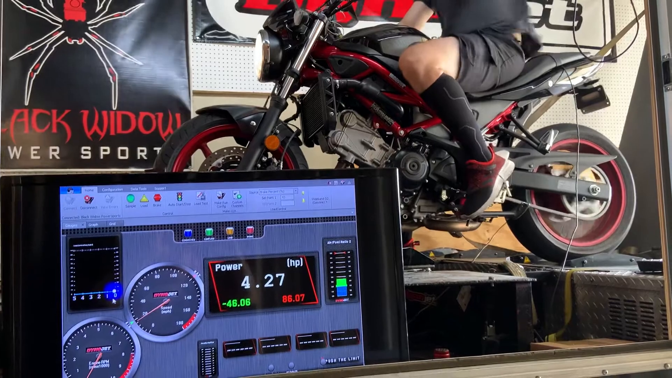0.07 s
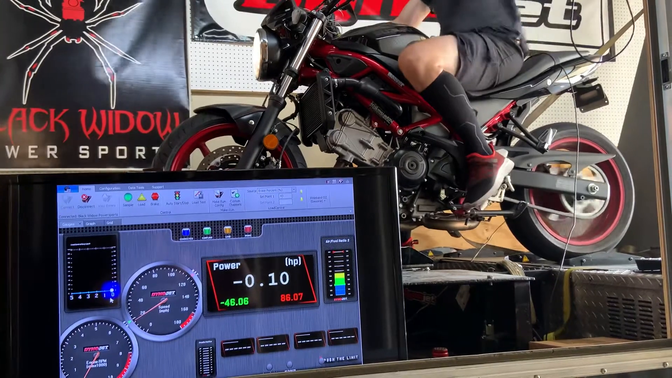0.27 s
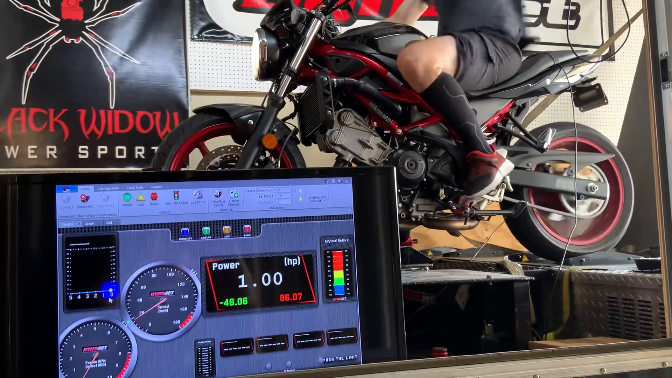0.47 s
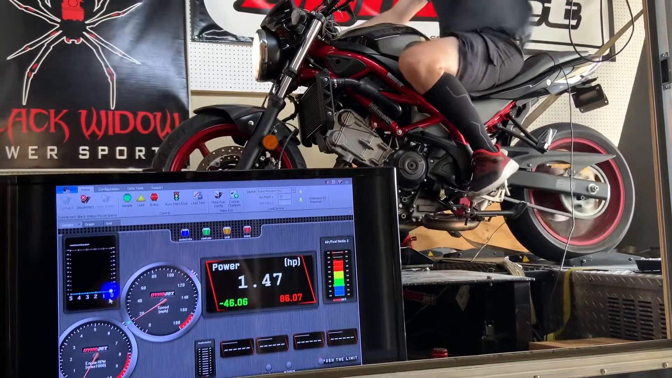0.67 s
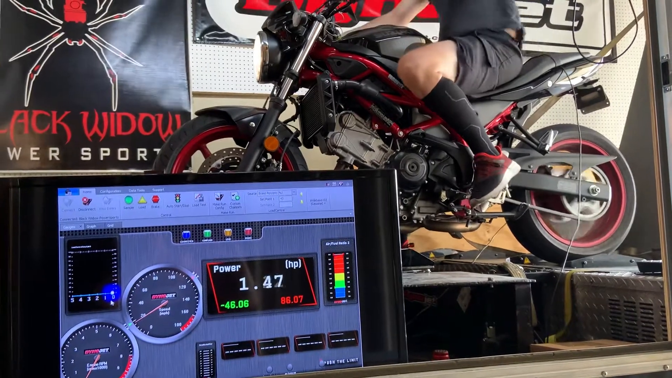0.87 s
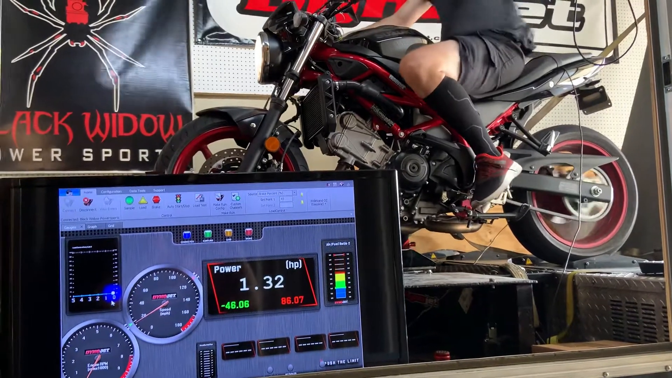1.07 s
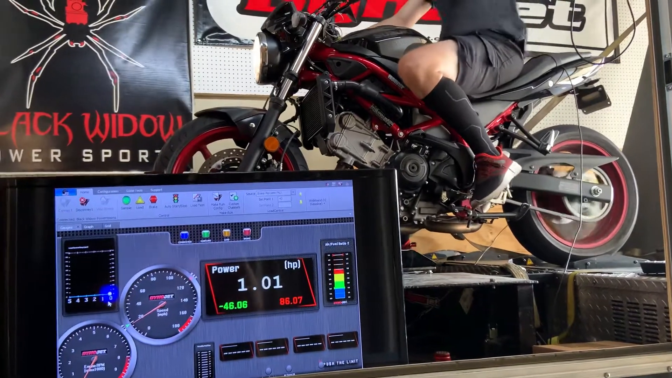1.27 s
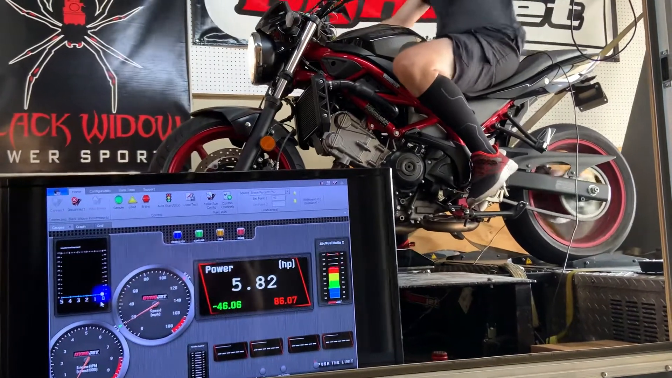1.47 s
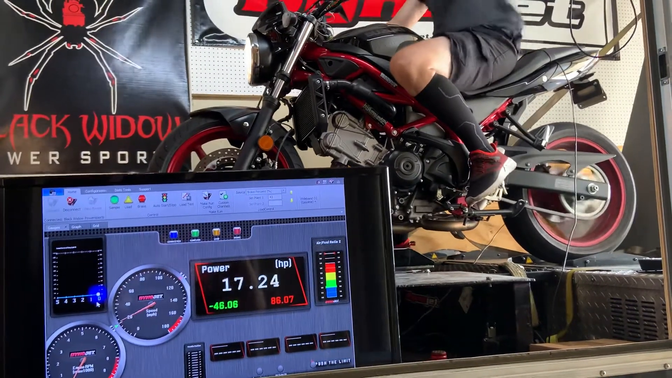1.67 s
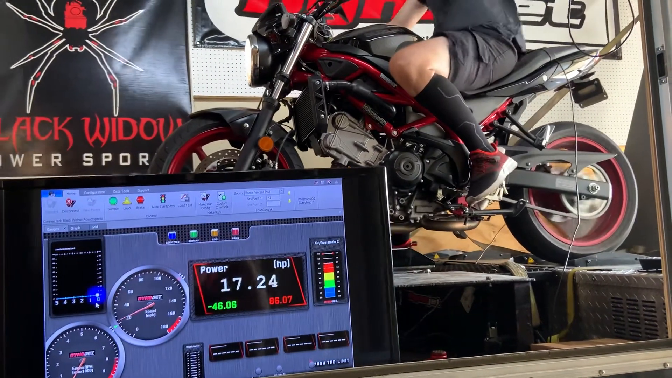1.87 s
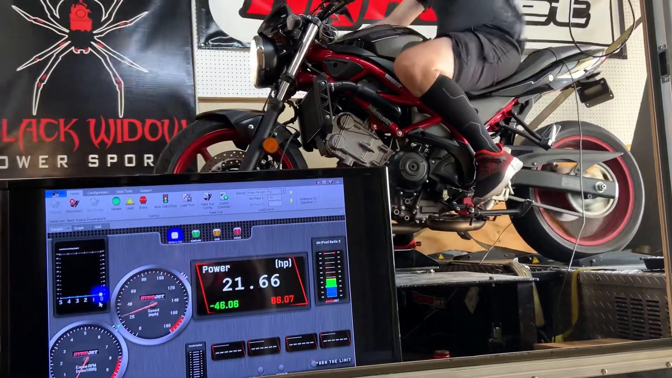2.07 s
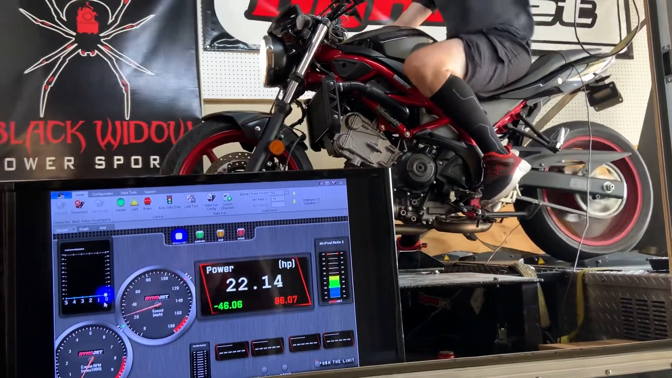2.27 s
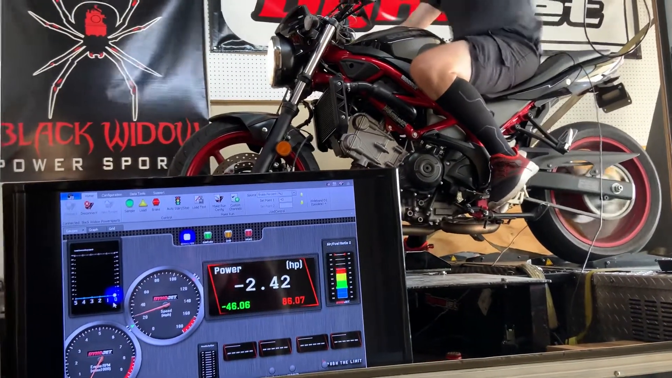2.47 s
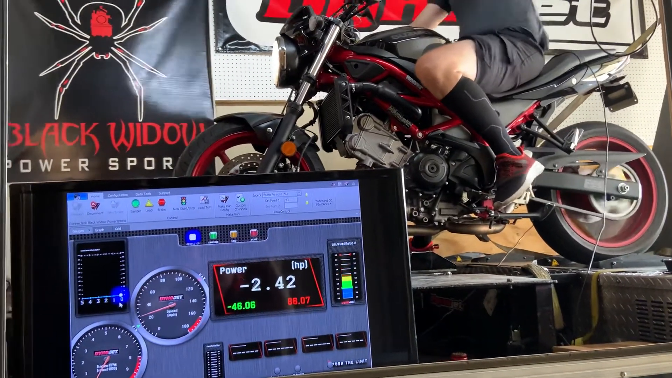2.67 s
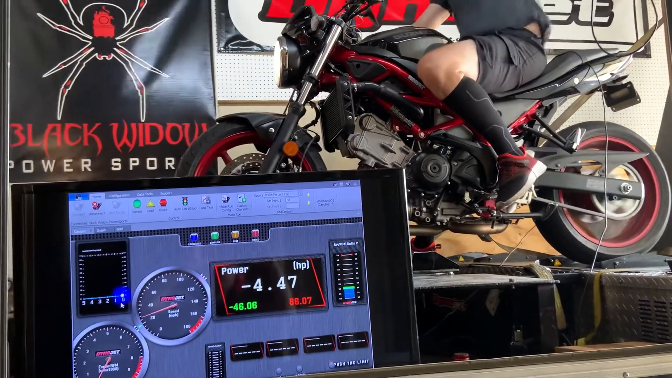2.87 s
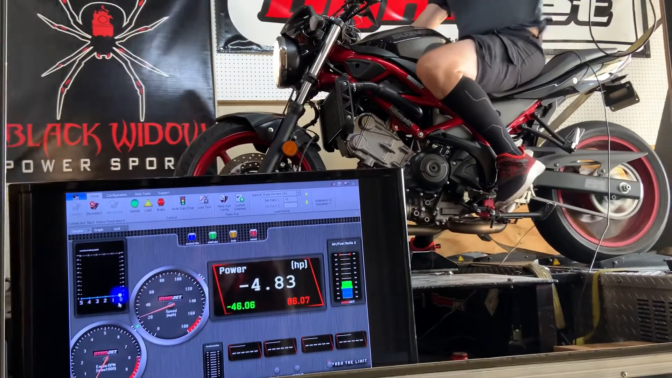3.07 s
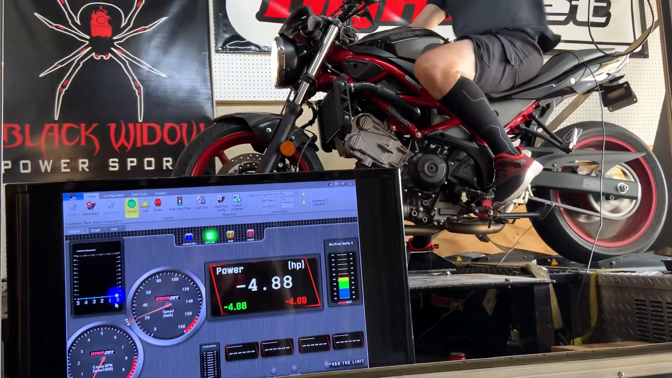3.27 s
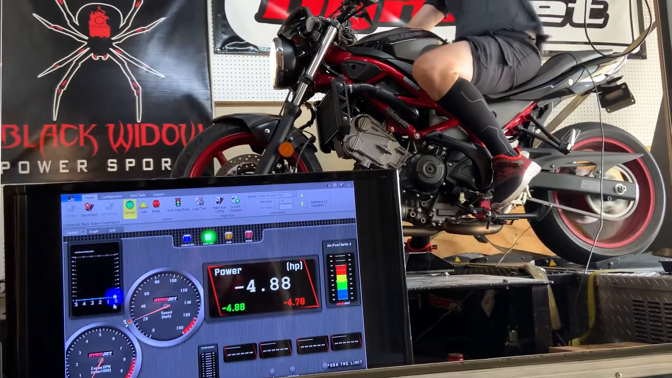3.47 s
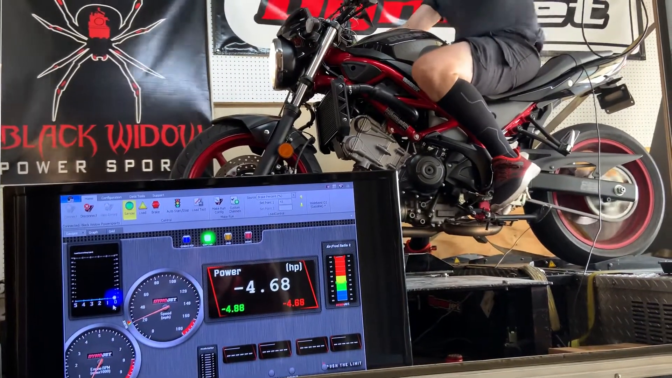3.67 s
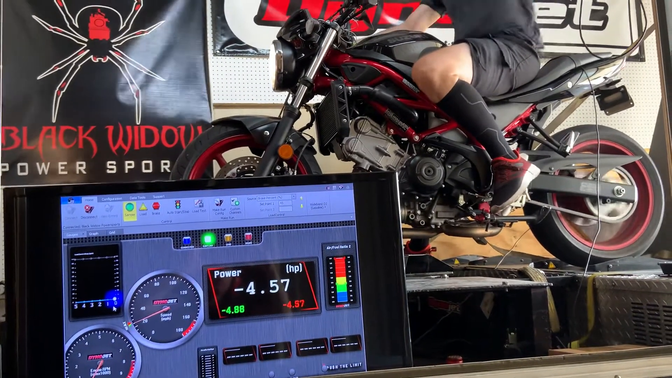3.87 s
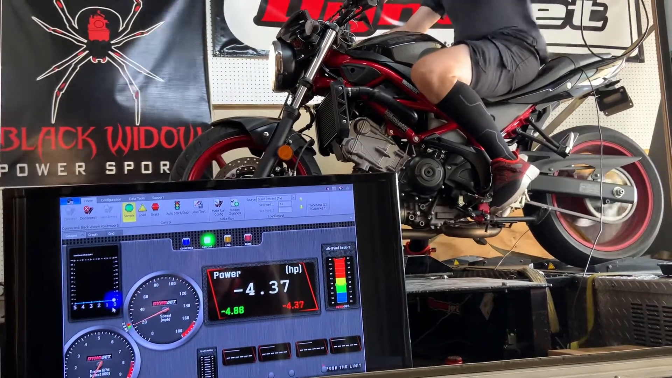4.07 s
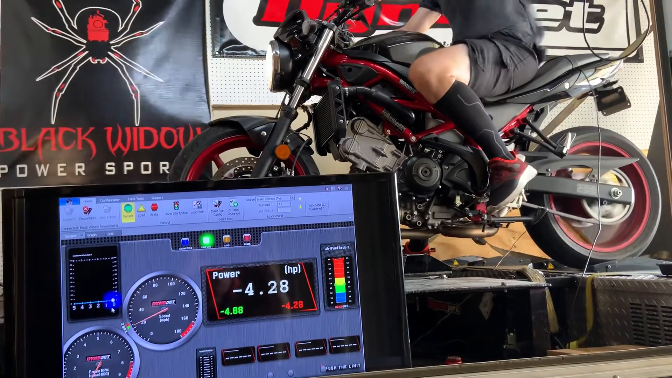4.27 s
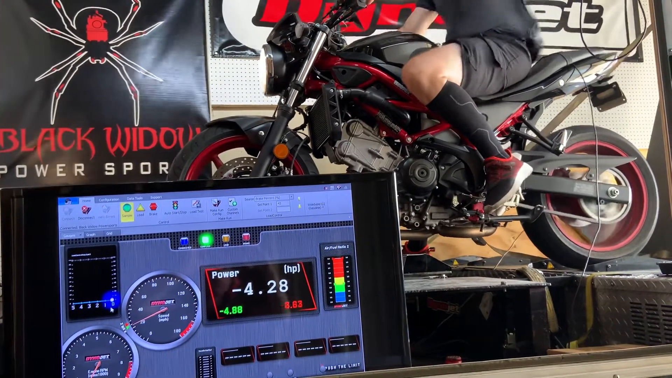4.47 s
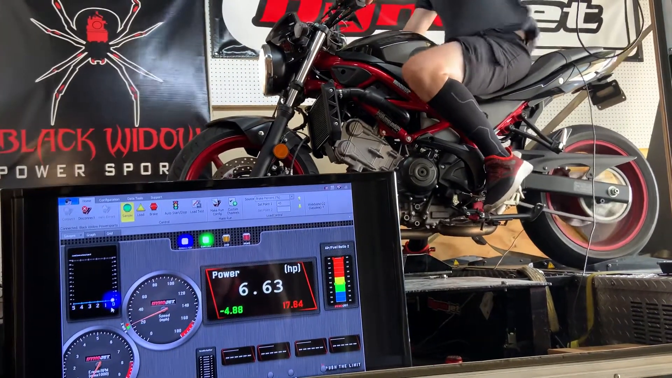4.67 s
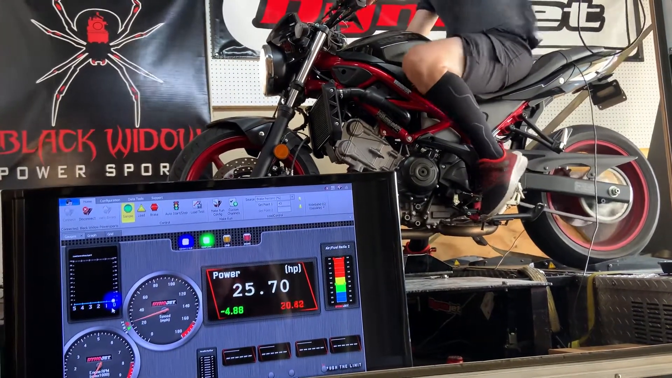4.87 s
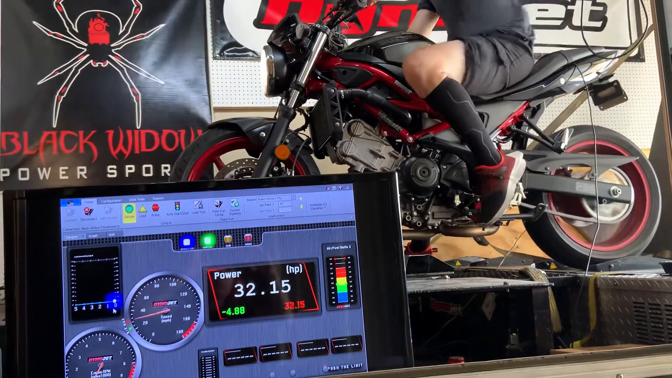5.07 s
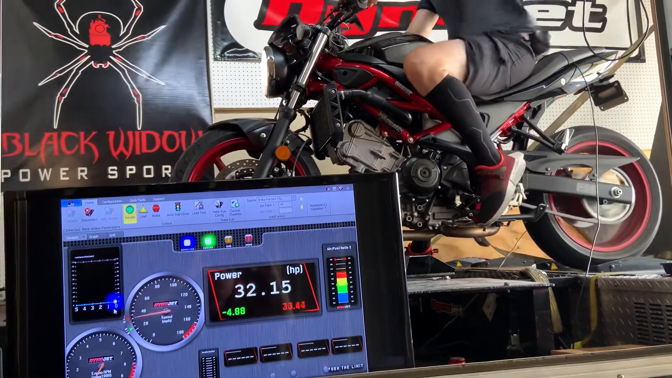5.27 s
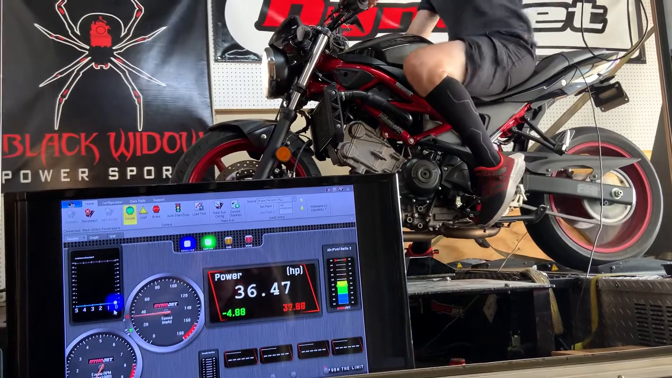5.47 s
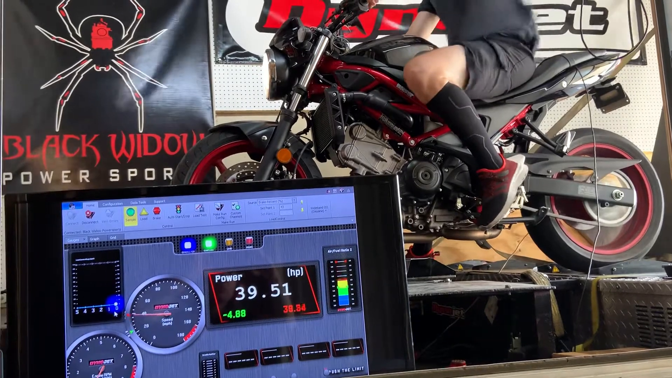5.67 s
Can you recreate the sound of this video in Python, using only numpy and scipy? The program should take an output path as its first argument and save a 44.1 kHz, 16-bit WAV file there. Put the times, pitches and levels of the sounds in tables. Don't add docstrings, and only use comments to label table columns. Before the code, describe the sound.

A V-twin motorcycle runs on rollers in a hard, reflective workshop, heard by a handheld stereo recorder. From 0 to about 1 second it runs lightly with soft, lumpy, uneven exhaust pulses beneath a constant broadband blower and drive-train roar. A small intake gulp comes at 1.0, and from 1.2 the throttle opens: the thuds thicken into a growl, rising in pitch until 1.95, while the recorder pulls its level down around 1.4 to 1.5. The throttle shuts near 2.0; the exhaust drops to a muffled irregular flutter with low humming tones and a thin whine. A very brief dip marks the clutch at 2.3. Pitch sags slowly until about 4.1, the background lifting slightly at 2.6. At 4.2 an intake gulp and ragged stumble lead into a hard pull, climbing steadily, harder and raspier, still barking loudly at the end, around 5.7, with further gain reductions.

```python
import sys
import numpy as np
from scipy import signal
from scipy.fft import rfft, irfft, next_fast_len
from scipy.io import wavfile
from scipy.ndimage import uniform_filter1d

SR = 44100
rng = np.random.default_rng(int(sys.argv[2]) if len(sys.argv) > 2 else 0)


def to_wav(sig):
    pcm = np.clip(np.atleast_2d(sig), -1, 1) * 32767
    pcm = np.round(pcm).astype(np.int16)
    wavfile.write(sys.argv[1], SR, pcm.T)


def gain_from_db(level_db):
    decades = np.asarray(level_db, float) / 20
    return 10 ** decades


N = 252693

# time in seconds, four-stroke cycles per second in Hz.
SPEED_HZ = [(0.0, 17.6), (0.29, 18.7), (0.99, 19.0), (1.2, 20.0), (1.79, 27.0), (1.93, 28.7), (2.12, 28.1),
            (2.23, 27.1), (2.33, 28.3), (2.55, 27.9), (3.42, 25.6), (3.7, 24.6), (4.08, 23.8), (4.26, 24.0),
            (4.36, 25.8), (5.01, 34.6), (5.47, 41.4), (5.73, 44.6)]
# time in seconds, effort in dB.
EFFORT_DB = [(0, -21.5), (.5, -20), (1.0, -19.5), (1.2, -16), (1.37, -10), (1.48, -7), (1.6, -6.5),
             (1.93, -4.5), (2.02, -14.5), (2.12, -22.5), (2.9, -20), (4.12, -20), (4.24, -11.5),
             (4.4, -7.5), (4.6, -4.5), (5.0, -4), (5.36, -7), (5.73, -8)]
# frequency in Hz, width in Hz, level in dB.
THUMP_MODES = [(154.6, 157, 6.5), (345, 457, 8), (533, 483, 4)]
BARK_MODES = [(606, 94, 9.8), (1056, 375, 1.83), (1365, 35, 6.6)]
# frequency in Hz, width in Hz, level in dB.
RASP_MODES = [(1530, 950, -10.5), (1823, 153, 2.5), (2380, 230, -13.5), (4500, 540, -49)]
# frequency in Hz, width in Hz, level in dB.
BOOM_MODES = [(147, 118, -0.5)]
# multiple of the cycle rate, level at light load in dB, rise at full load in dB,
# level on a shut throttle in dB.
PUMP_ORDERS = [(2, -24, 9, -16.5), (3, -19.5, 4.5, -18.5), (4, -28, 3, -32), (5, -62, 0, -15.5),
               (7, -70, 0, -18), (8, -24, -19, -28.5), (9, -50, -4, -26), (10, -60, 0, -33.5)]
# frequency in Hz, level in dB.
BASS_DB = [(38, -11), (52, -4), (61, -14.5), (74, 1.5), (88, -9), (112, -9.5), (132, -3), (192, 0)]
# frequency in Hz, width in Hz, level in dB.
WHINE_MODES = [(371.8, 26, -28)]
# frequency in Hz, width in Hz, lift in dB.
SHOP_MODES = [(73, 14, 4), (178, 26, 8), (203, 14, -16), (240, 40, 2), (272, 20, -22), (322, 24, 3),
              (345, 14, -4), (369, 16, 5), (388, 14, -12), (412, 24, 3), (432, 14, -11), (455, 24, 3),
              (500, 16, -10), (517, 20, 4), (597, 24, -10), (632, 24, 3), (653, 16, -16), (715, 30, 3),
              (780, 45, -16), (880, 35, 4), (910, 22, -14), (1017, 30, 4), (1072, 24, 5), (1131, 28, 5),
              (1162, 20, -10), (1335, 25, -9), (1395, 30, 5), (1570, 50, 4), (1760, 30, 5), (1800, 30, -10)]
# start in seconds, level in dB.
GULPS_DB = [
    (.99, -43),
    (1.18, -42.5),
    (4.204, -36),
]
# frequency in Hz, density in dB per Hz.
BLOWER_SPECTRUM_DB = [(40, 21), (80, 27.5), (200, 22), (400, 19), (1000, 14), (1900, 8.5), (3000, 3),
                      (4400, 2), (5200, -2.5), (7000, -2.5), (8600, -0.5), (11500, -2.5), (15500, -2)]
# frequency in Hz, left-right likeness 0-1.
LIKENESS = [(60, 0.92), (200, 0.68), (500, 0.55), (1000, 0.66), (1800, 0.31), (3000, 0.046), (5500, 0.097),
            (7000, 0.6), (8500, 0.95), (16000, 0.67)]
# frequency in Hz, left minus right in dB.
TILT_DB = [(60, -0.5), (3000, 0.4), (4500, 0), (5700, -5.5), (7500, 0.4)]
# frequency in Hz, width in Hz, lift in dB.
ROAR_MODES = [(1550, 180, -4), (1830, 260, 3), (4300, 900, 3), (5350, 800, -4.5)]
# time in seconds, step in dB.
GAIN_STEPS_DB = [(1.389, -3.5), (1.515, -3), (2.62, 3), (4.45, -2.5), (4.62, -2), (5.0, -1)]
# low edge in Hz, high edge in Hz, share of time 0-1
MID_GAPS = [(7600, 8250, .6), (8250, 8950, 1.1), (8950, 9600, .25), (12450, 13100, .55),
            (13100, 13750, 1.1), (13750, 14450, .6), (15800, 22000, 1.1)]
SIDE_GAPS = [(10350, 11700, .985), (14450, 15150, .3), (15150, 22000, 1.1)]

SECOND_FIRING_CYCLES, SECOND_CYLINDER_DB = 270 / 720, 0.5
SHUT_S, OPEN_S, TWIST_S = 1.985, 4.17, .05
LIGHT_DB, FULL_DB = -20, -8
STUMBLE_S, STUMBLE_WIDTH_S = 4.3, .13
SHIFT_S, SHIFT_WIDTH_S, SHIFT_DB = 2.292, .018, -9.0
UNEVEN_LIGHT, UNEVEN_FULL, UNEVEN_STUMBLE, UNEVEN_SHUT = (1.5, .15), (.5, .03), (2.5, .4), (2.5, .5)
THUMP_DB, THUMP_SHUT_DB = -1.5, -7
BARK_DB, BARK_DB_PER_EFFORT_DB, BARK_DB_PER_HZ = -10.0, 1.104, 0.5278
BARK_SHUT_DB, BARK_STUMBLE_DB = -9, -5
RASP_DB_PER_HZ, BOOM_DB_PER_HZ = 0.84, -3
PAN_LIGHT_DB, PAN_FULL_DB = 0.5, 0.6
WHINE_ORDERS = (13, 14, 15)
PUMP_WOBBLE_DB, PUMP_PAN_DB, PUMP_STUMBLE_DB = 1, -1.5, -11.5
BEFORE_SHIFT_DB = -2.5
SPREAD_CYCLES = 1 / 18
SHOP_T60_S, WALL_CUT_HZ, SHOP_DB = .3, 4000, -13
ENGINE_SHOP_DEPTH, ROAR_SHOP_DEPTH = 1.11, 0.25
BLOWER_DB, RUSH_DB = -39.5, -24
RUSH_FROM_HZ, RUSH_BASS_SHARE, RUSH_FADE_S, GULP_S = 760, .45, 0.01, .025
PORT_LAG_S, PORT_FROM_HZ = .0002, 6000
GAIN_STEP_S = 0.0034


def exhaust(cycles, speed_hz, thump_db, bark_db, jet_db, jet_s):
    clicks = -firings(cycles)
    r = np.exp(-1 / (jet_s * SR))
    jet = rms_one(signal.lfilter([1], [1, -r], clicks) * rng.standard_normal(N))
    blow = rms_one(clicks) + gain_from_db(jet_db) * jet

    thump = filtered(resonate(clicks, THUMP_MODES), 3, 125, "high")
    thump = thump + gain_from_db(BOOM_DB_PER_HZ * (speed_hz - 21.5)) * resonate(clicks, BOOM_MODES)
    thump = echoes(resonate(thump, [(220, 600, 0)]), (.0043, .0107), .7)

    rasp = gain_from_db(RASP_DB_PER_HZ * (speed_hz - 39.5)) * resonate(blow, RASP_MODES)
    bark = echoes(resonate(blow, BARK_MODES) - rasp, (.0107,), .75)
    return gain_from_db(thump_db) * evened(thump) + gain_from_db(bark_db) * evened(bark)


def firings(cycles):
    _, load, shut = throttle()
    stumble = bump(STUMBLE_S, STUMBLE_WIDTH_S)
    spread_db, spread_ms = [
        light + (full - light) * load + stumbling * stumble + coasting * shut
        for light, full, stumbling, coasting in zip(UNEVEN_LIGHT, UNEVEN_FULL, UNEVEN_STUMBLE, UNEVEN_SHUT)]
    turn = np.arange(int(cycles[-1]) + 1)[:, None] + [0, SECOND_FIRING_CYCLES]
    at = np.interp(turn.ravel(), cycles, np.arange(N)).astype(int)
    luck = rng.standard_normal((400, 2))[:len(at)]
    size_db = spread_db[at] * luck[:, 0] + SECOND_CYLINDER_DB * (np.arange(len(at)) % 2)
    late = spread_ms[at] * luck[:, 1] * SR / 1000
    clicks = np.full(N, 1e-18)
    clicks[np.clip(at + late, 0, N - 1).astype(int)] = gain_from_db(size_db)
    return clicks


def throttle():
    effort_db, = in_time(EFFORT_DB)
    shut, = in_time([(SHUT_S - TWIST_S, 0), (SHUT_S, 1), (OPEN_S, 1), (OPEN_S + TWIST_S, 0)])
    load = np.clip((effort_db - LIGHT_DB) / (FULL_DB - LIGHT_DB), 0, 1)
    return effort_db, load, shut


def pumping(cycles, speed_hz):
    _, load, shut = throttle()

    def tone(order):
        return np.sqrt(2) * np.sin(2 * np.pi * (order * cycles + SPREAD_CYCLES * order ** 2))

    whine = resonate(sum(map(tone, WHINE_ORDERS)), WHINE_MODES)
    out = shut * gain_from_db(3.3 * drift(4.6)) * whine
    for order, light_db, load_db, shut_db in PUMP_ORDERS:
        level = (1 - shut) * gain_from_db(light_db + load_db * load) + shut * gain_from_db(shut_db)
        wobble_db = PUMP_WOBBLE_DB * (1 - 0.51 * shut) * (1 - load / 2) * drift(6.7)
        out = out + level * gain_from_db(at_hz(BASS_DB, order * speed_hz) + wobble_db) * tone(order)
    out = standing_waves(out, SHOP_MODES[2:3], 1)
    before_shift = shut * (np.arange(N) / SR < SHIFT_S)
    dips_db = BEFORE_SHIFT_DB * before_shift + PUMP_STUMBLE_DB * bump(STUMBLE_S - .04, 0.079)
    return out * gain_from_db(dips_db) * pan(PUMP_PAN_DB)


def workshop(x):
    out, dull = np.zeros((2, N)), np.exp(-2 * np.pi * WALL_CUT_HZ / SR)
    for k, lag in enumerate((rng.uniform(.006, .03, 16) * SR).astype(int)):
        loop, gain, state = x.copy(), gain_from_db(-60 * lag / SR / SHOP_T60_S), [0.]
        for i in range(lag, N, lag):
            back, state = signal.lfilter([gain * (1 - dull)], [1, -dull], loop[i - lag:i], zi=state)
            loop[i:i + lag] += back[:N - i]
        out[k % 2] += (loop - x) * (-1) ** (k // 2)
    mid = filtered((out[0] + out[1]) / 2, 2, 900, "high")
    side = filtered((out[0] - out[1]) / 2, 2, 450, "high")
    return np.array([mid + side, mid - side])


def standing_waves(x, modes, depth):
    for hz, width_hz, db in modes:
        x = x + (gain_from_db(depth * db) - 1) * resonate(x, [(hz, width_hz, 0)])
    return x


def roar(effort_db):
    t, r = np.arange(N) / SR, np.exp(-1 / (RUSH_FADE_S * SR))
    gulps = sum(gain_from_db(db) ** 2 * (t > s) * np.exp(-np.abs(t - s) / GULP_S) for s, db in GULPS_DB)
    rush = signal.lfilter([1 - r], [1, -r], gain_from_db(effort_db + RUSH_DB) ** 2)
    swell = np.sqrt(1 + (rush + gulps) / gain_from_db(BLOWER_DB) ** 2)
    air = gain_from_db(BLOWER_DB + 3.0) * blower(patchy_db=0.67)
    bass = filtered(air, 1, RUSH_FROM_HZ, "low")
    return standing_waves(swell ** RUSH_BASS_SHARE * bass + swell * (air - bass), ROAR_MODES, 0.78)


def blower(patchy_db):
    out, together, edges_hz = 0, drift(9), 36 * 2 ** np.arange(0, 9, .3)
    shared, left, right = rng.standard_normal((3, 2, N))
    above_hz = np.maximum(np.arange(N // 2 + 1) * SR / N - PORT_FROM_HZ, 0)
    early = irfft(rfft(shared) * np.exp(2j * np.pi * above_hz * PORT_LAG_S), N)
    for k, (low_hz, high_hz) in enumerate(zip(edges_hz, edges_hz[1:])):
        hz, n = np.sqrt(low_hz * high_hz), k % 2
        alike = np.clip(at_hz(LIKENESS, hz), 0, .99)
        common = np.sqrt(alike) * np.array([shared[n], early[n]])
        pair = common + np.sqrt(1 - alike) * np.array([left[n], right[n]])
        band = filtered(pair, 2, [low_hz, high_hz], "band")
        flicker_db = patchy_db * (0.64 * together + 2.14 * drift(29))
        out = out + gain_from_db(at_hz(BLOWER_SPECTRUM_DB, hz) + flicker_db) * band * pan(at_hz(TILT_DB, hz))
    return out / filtered(out, 4, [9000, 12500], "band").std()


def resonate(x, modes):
    out = 0
    for k, (hz, width_hz, db) in enumerate(modes):
        r = np.exp(-np.pi * width_hz / SR)
        b = (1 - r * r) / 2 * np.array([1, 0, -1])
        a = [1, -2 * r * np.cos(2 * np.pi * hz / SR), r * r]
        out = out + (-1) ** k * gain_from_db(db) * signal.lfilter(b, a, x)
    return out


def echoes(x, lags_s, share):
    for lag_s in lags_s:
        taps = np.zeros(int(lag_s * SR) + 1)
        taps[[0, -1]] = -share, 1
        x = signal.lfilter(taps, taps[::-1], x)
    return x


def filtered(x, order, hz, kind):
    return signal.sosfilt(signal.butter(order, hz, kind, fs=SR, output="sos"), x)


def pan(db):
    return gain_from_db(db / 2 * np.array([[1], [-1]]))


def rms_one(x):
    return x / np.sqrt(np.mean(x ** 2) + 1e-20)


def evened(x):
    return x / np.sqrt(uniform_filter1d(x ** 2, size=SR // 4) + 1e-12)


def in_time(rows):
    s, *columns = np.transpose(rows)
    return [np.interp(np.arange(N) / SR, s, c) for c in columns]


def at_hz(points, hz):
    points_hz, values = np.transpose(points)
    return np.interp(np.log(hz), np.log(points_hz), values)


def drift(rate_hz):
    r = np.exp(-80 * np.pi * rate_hz / SR)
    slow = signal.lfilter([1], [1, -2 * r, r * r], rng.standard_normal(N // 40 + 2002))[2000:]
    return np.interp(np.arange(N) / 40, np.arange(len(slow)), rms_one(slow))


def bump(at_s, width_s):
    return np.exp(-((np.arange(N) / SR - at_s) / width_s) ** 2)


def drop_bands(x, gaps):
    size = next_fast_len(N)
    spectrum, hz = rfft(x, size), np.arange(size // 2 + 1) * SR / size
    for low_hz, high_hz, share in gaps:
        luck = uniform_filter1d(rng.standard_normal(N // 1024 + 2), size=2)
        off = luck <= np.quantile(luck, min(share, 1))
        gate = uniform_filter1d(np.repeat(off * 1., 1024)[221:221 + N], size=600)
        x = x - gate * irfft(spectrum * (hz >= low_hz) * (hz < high_hz), size)[:N]
    return x


def scene():
    speed_hz, = in_time(SPEED_HZ)
    cycles = np.cumsum(speed_hz) / SR + .55
    effort_db, load, shut = throttle()
    thump_db = effort_db + THUMP_DB + THUMP_SHUT_DB * shut
    bark_db = BARK_DB + BARK_DB_PER_EFFORT_DB * effort_db + BARK_DB_PER_HZ * (speed_hz - 26)
    bark_db = bark_db + BARK_SHUT_DB * shut + BARK_STUMBLE_DB * bump(STUMBLE_S, STUMBLE_WIDTH_S)
    pipe = exhaust(cycles, speed_hz, thump_db, bark_db, jet_db=-14.0, jet_s=.003)
    engine = standing_waves(pipe + gain_from_db(SHOP_DB) * workshop(pipe), SHOP_MODES, ENGINE_SHOP_DEPTH)
    engine = engine * pan(PAN_LIGHT_DB + (PAN_FULL_DB - PAN_LIGHT_DB) * load)
    engine = (engine + pumping(cycles, speed_hz)) * gain_from_db(SHIFT_DB * bump(SHIFT_S, SHIFT_WIDTH_S))
    return engine + standing_waves(roar(effort_db), SHOP_MODES, ROAR_SHOP_DEPTH)


def low_pass(x):
    return signal.sosfilt(signal.butter(12, 17090, fs=SR, output="sos"), x)


def record(dry):
    x = filtered(dry, 3, 40, "high")
    gain_db = sum(db * in_time([(s - GAIN_STEP_S, 0), (s + GAIN_STEP_S, 1)])[0] for s, db in GAIN_STEPS_DB)
    left, right = .97 * np.tanh(x * gain_from_db(gain_db) / .97)
    mid = drop_bands((left + right) / 2, MID_GAPS)
    side = drop_bands((left - right) / 2, SIDE_GAPS)
    return low_pass(np.array([mid + side, mid - side]))


dry = scene()
out = record(dry)
to_wav(out)
```